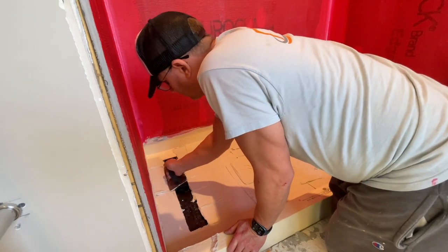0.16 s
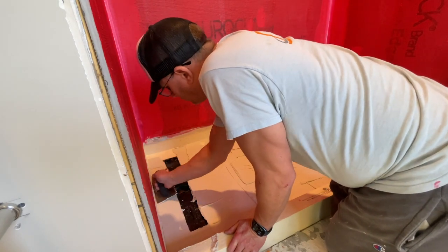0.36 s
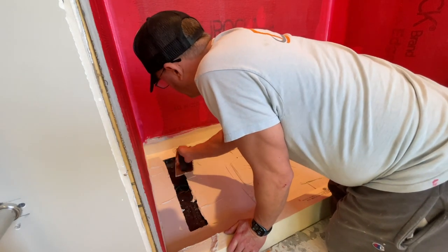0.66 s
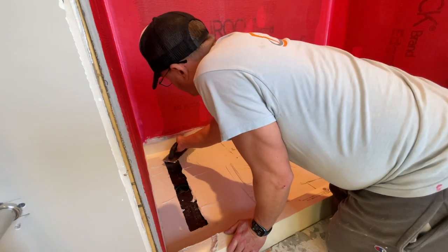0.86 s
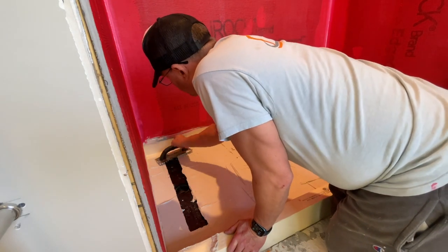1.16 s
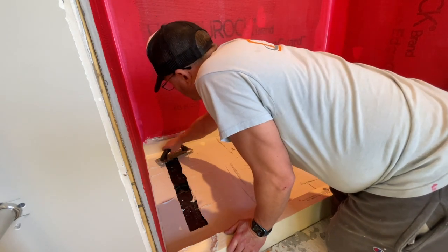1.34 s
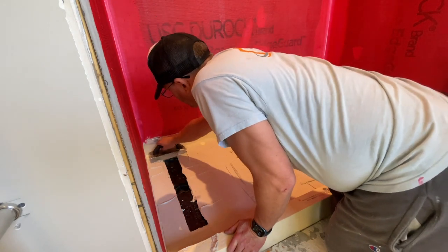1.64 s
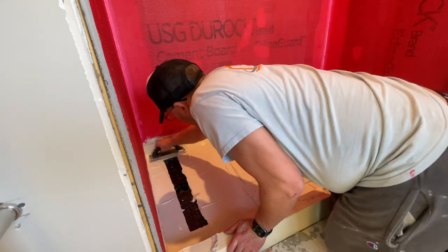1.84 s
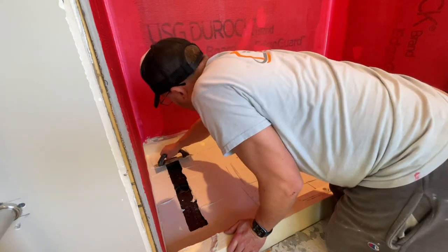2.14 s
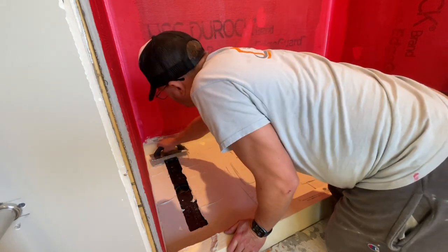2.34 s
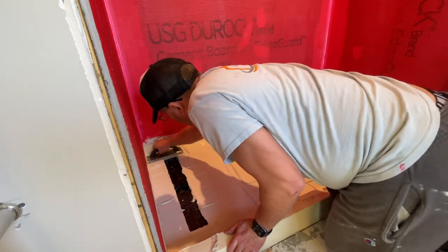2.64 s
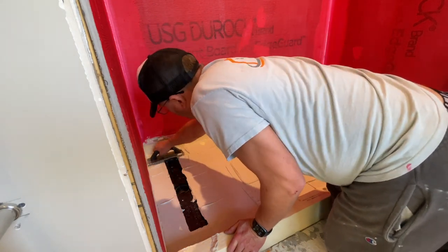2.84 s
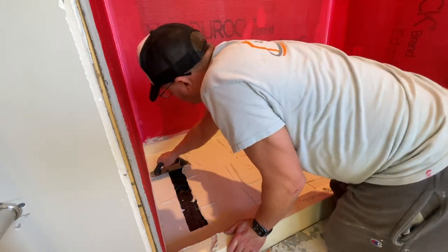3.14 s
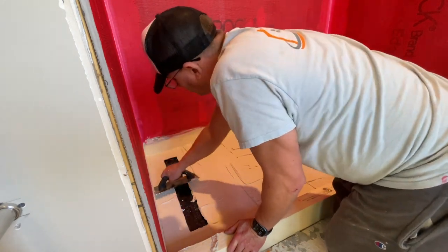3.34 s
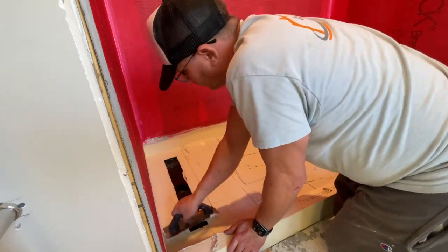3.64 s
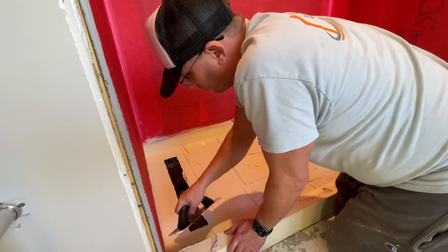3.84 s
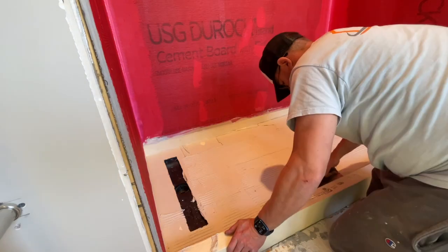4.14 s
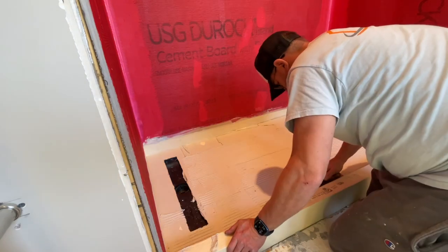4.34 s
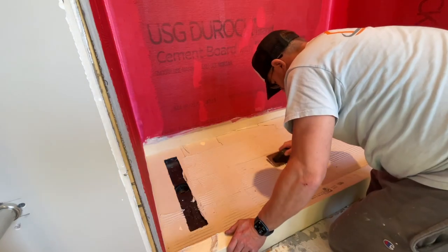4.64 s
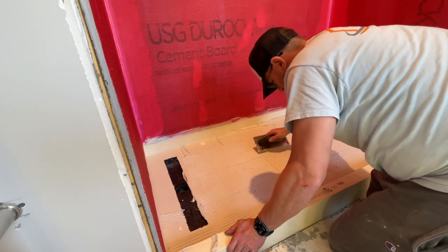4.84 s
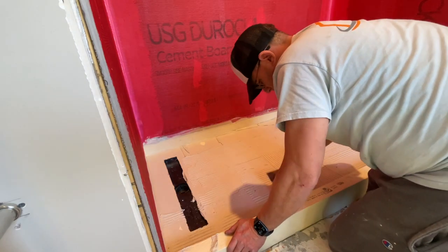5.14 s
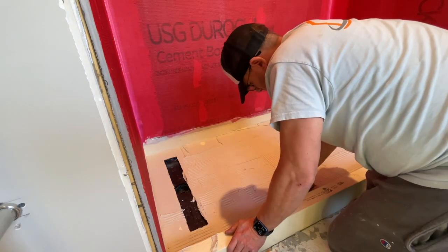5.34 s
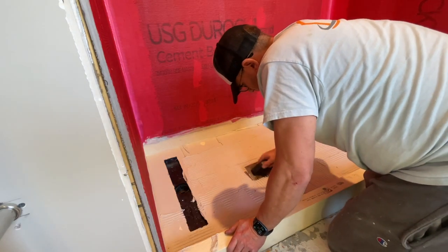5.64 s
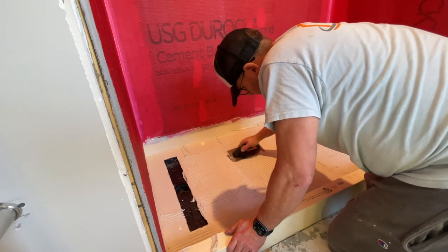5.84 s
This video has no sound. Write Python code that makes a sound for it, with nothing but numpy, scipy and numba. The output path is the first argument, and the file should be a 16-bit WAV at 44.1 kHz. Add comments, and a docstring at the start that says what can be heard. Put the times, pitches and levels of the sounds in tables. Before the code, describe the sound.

A small bare bathroom with a low, faint rumble and bright, diffuse echoes, heard close in stereo. A short gritty dab opens at 0 s. At 0.35 s the trowel lands with a sharp, hollow double knock and wet slap, a lesser knock at 0.4, then a rasp to 0.55. Light dabs with tiny ticks and soft thuds follow around 1.05, 1.3-1.4 and 1.6-1.8 s. A faint sweep runs 1.9-2.2 s, ending in a dull bump; very quiet touches and bumps follow to 2.7. From 2.7 to 3.8 s a long, light drag sounds hollower midway and flares briefly at 3.7. After a pause and a small dab at 4.2, a loud, sandy scrape swells from 4.37, peaks near 4.6-4.8 and stops by 4.94, with steely ring and sliding hollow tone. Small knocks at 5.3 precede another strong scrape, 5.4-6 s, loudest near 5.6.

```python
"""Small, bare bathroom: a steel trowel spreads mortar over a foam shower tray, in short dabs and long sweeps.
Scrape and hiss: random sand-grain impulses, filtered; they ring the blade's modes and boom in the hollow tray.
Sweeps add the gliding note of the air wedge under the blade. Knocks are decaying tray modes with a wet slap;
edge ticks and dull bumps are short noise bursts. Background noise, mostly low, lies under it all.
A phone close by hears mostly the room: diffuse echoes and the shower stall's standing waves."""
import sys
import numpy as np
from scipy import signal
from scipy.fft import rfft, irfft
from scipy.io import wavfile
from scipy.ndimage import map_coordinates
from numba import njit

SR = 44100
rng = np.random.default_rng(int(sys.argv[2]) if len(sys.argv) > 2 else 0)


def wav_record(signal):
    """Record a signal, one row per channel, as 16-bit PCM in the file named by sys.argv[1]."""
    frames = np.transpose(np.atleast_2d(signal))
    bounded = np.clip(frames, -1, 1)
    # unit amplitude maps onto the largest positive 16-bit level
    quanta = np.round(bounded * 32767).astype(np.int16)
    wavfile.write(sys.argv[1], SR, quanta)


N = 264159
T = np.arange(N) / SR
TAIL_SAMPLES = int(.7 * SR)

# spectrum of the scrape: f/Hz, relative level/dB
SCRAPE_SPECTRUM = [(300, -40), (600, -2), (850, 1.5), (1300, 7), (1900, 4.5), (2700, 1.5), (3800, -0.5),
                   (4700, -6), (6000, -35.5)]
# spectrum of the sand's hiss: f/Hz, relative level/dB
HISS_SPECTRUM = [(2500, -23.5), (4000, -7.5), (5100, -4), (5650, -11), (6100, -4.5), (6950, -5),
                 (7400, -13), (8100, -7), (8900, -8), (9600, -15), (11000, -7), (12700, -6.5), (14500, -14),
                 (16000, -27)]
# long sweeps, one pressure curve each: t/s, pressure as scrape level/dB
SWEEP_PRESSURES = [
    [(1.89, -45.5), (1.97, -39), (2.096, -40.5), (2.164, -35.5), (2.2, -60)],
    [(2.712, -50.5), (2.808, -43), (2.954, -44), (3.09, -42), (3.102, -37.5), (3.558, -38), (3.696, -27),
     (3.77, -44), (3.79, -40)],
    [(4.365, -43), (4.385, -37.5), (4.465, -28.5), (4.555, -28.5), (4.619, -23), (4.673, -25), (4.779, -24),
     (4.94, -66)],
    [(5.395, -45), (5.487, -27), (5.613, -22.5), (5.767, -26), (5.803, -28), (5.929, -27), (5.99, -72)],
]
SWEEP_DB = 0.5  # added to every pressure
EASY_DB = -39  # easy pressure, where layer offsets apply


def undb(db):
    """Decibels to gain."""
    return 10 ** (np.asarray(db) / 20)


def unit(x):
    """Scale to rms 1."""
    return x / np.sqrt(np.mean(x ** 2))


def along(rows):
    """Each column of a time curve, sample by sample."""
    s, *columns = np.transpose(rows)
    return [np.interp(T, s, c) for c in columns]


def at_hz(points, hz):
    """Read a table on a log-frequency axis."""
    f, value = np.transpose(points)
    return np.interp(np.log(hz + 1), np.log(f), value)


def colour(x, points, size=2048):
    """Minimum-phase filter with the given spectrum, by folding the cepstrum."""
    log_gain = np.log(undb(at_hz(points, np.fft.rfftfreq(size, 1 / SR))))
    cepstrum = irfft(log_gain)
    cepstrum[1:size // 2] *= 2
    cepstrum[size // 2 + 1:] = 0
    response = irfft(np.exp(rfft(cepstrum)))
    return signal.fftconvolve(x, response)[:N]


@njit
def resonate(x, hz, width):
    """State-variable band-pass; centre hz may move every sample, width in Hz."""
    y, band, low = np.empty(len(x)), 0., 0.
    for i in range(len(x)):
        g, k = np.tan(np.pi * hz[i] / SR), width / hz[i]
        v = (band + g * (x[i] - low)) / (1 + g * (g + k))
        band, low, y[i] = 2 * v - band, low + 2 * g * v, k * v
    return y


def walk(rate_hz):
    """Random wander, rms 1, linear between rate_hz knots per second."""
    return unit(np.interp(T * rate_hz, np.arange(4096), rng.standard_normal(4096)))


def add(track, s, sound):
    """Lay a sound into the track at time s."""
    i = max(int(s * SR), 0)
    track[i:i + len(sound)] += sound[:N - i]


def background(level_db=-54.5, side_db=-9, waver_db=1.4):
    """Background noise: low rumble with faint hiss on top, wavering a little."""
    # background spectrum: f/Hz, relative level/dB
    background_spectrum = [(20, -28), (50, -5), (70, 2), (120, -2.5), (190, 2), (300, -3.5), (450, -8),
                           (700, -13.5), (1500, -26), (3000, -33), (8000, -44), (16000, -36.5)]
    mid, side = (unit(colour(rng.standard_normal(N), background_spectrum)) * undb(waver_db * walk(14))
                 for _ in range(2))
    return undb(level_db) * (mid + undb(side_db) * side * np.array([[1], [-1]]))


def grains(rate_hz, spread_db):
    """Sand grains snapping free: random impulses, many small, a few large."""
    size = undb(spread_db * np.minimum(rng.exponential(size=N), 6))
    snaps = rng.random(N) < rate_hz / SR
    return unit(snaps * size * rng.choice([-1, 1], N))


def contact(sweep, edge_s=0.0081):
    """1 from a sweep's first to last point, with short ramps outside."""
    return np.clip(np.minimum(T - sweep[0][0], sweep[-1][0] - T) / edge_s + 1, 0, 1)


def driven(sweep, offset_db, growth):
    """Gain of a layer in a sweep: offset_db at easy pressure, growth in dB per dB of pressure."""
    harder_db = along(sweep)[0] + SWEEP_DB - EASY_DB
    return contact(sweep) * undb(EASY_DB + offset_db + growth * harder_db)


def hand(sand_db=-2, sand_growth=0.77, hollow_db=-8, hollow_growth=0.4, release_s=0.047):
    """Gains of scrape, hiss and boom: sweeps follow pressure; dabs rise, hold and ease off."""
    # dabs working the mortar in: t/s, length/s, attack/s, level/dB, hiss re level/dB, boom re level/dB
    dabs = [ (0.0, .13, 0.01, -43, 1.5, 0), (0.404, 0.086, .015, -47, 4.5, 9.5),
            (0.462, .1, 0.036, -39, -5, -8.5), (0.652, 0.19, 0.013, -57, -3, -2.5),
            (1.02, .04, 0.006, -47.5, 1, -2), (1.053, 0.066, 0.0027, -50, -12, 9),
            (1.296, 0.072, 0.016, -61, -5, 2.5), (1.374, 0.043, 0.0026, -39.5, -15.5, -3),
            (1.613, .13, 0.02, -46.5, -13.5, 3.5), (1.7, 0.13, .01, -49, -1, 3.5),
            (2.325, 0.097, 0.013, -61, 3, 0), (2.496, 0.061, .003, -54.5, -3, -1.5),
            (2.538, 0.18, .02, -57, -4, 2), (4.225, 0.12, 0.0079, -49, -4, -13.5),
            (5.324, 0.05, 0.0054, -39, -10, 3), ]
    force = np.zeros((3, N))
    # the tray sounds hollower while the blade passes the drain
    drain_s, drain_spread_s, drain_db = 3.42, 0.33, 3.5
    boom_db = hollow_db + drain_db * np.exp(-((T - drain_s) / drain_spread_s) ** 2)
    for sweep in SWEEP_PRESSURES:
        force += [driven(sweep, 0, 0.99),
                  driven(sweep, sand_db, sand_growth),
                  driven(sweep, boom_db, hollow_growth)]
    for s, length_s, attack_s, level, hiss, boom in dabs:
        shape = np.clip(np.minimum((T - s) / attack_s, (s + length_s - T) / release_s), 0, 1)
        force += np.outer(undb([level, level + hiss, level + boom]), shape)
    return force


def scraping(judder_db=2, blade_db=-10, blade_bite=1.0, scrape_db=-1, hiss_db=0, boom_db=-1):
    """Grit drags under the blade in uneven slips, driving the steel and the tray beneath."""
    # narrow rings of the steel blade: f/Hz, width/Hz, relative level/dB
    blade_modes = [(1250, 7, -5), (1270, 19, -11), (1610, 23, -1), (1677, 6.9, 24.5), (1870, 28, 20),
                   (2210, 9.6, 24), (2320, 6, 9), (2690, 210, 14), (3350, 14, -6), (3731, 18, 3)]
    # spectrum of the hollow tray: f/Hz, relative level/dB
    boom_spectrum = [(50, -17), (130, -8), (250, 1), (400, 7), (580, 5.5), (800, 1.5), (1300, -31.5)]
    scrape_force, hiss_force, boom_force = hand()
    slips = undb(judder_db * walk(60))
    coarse = slips * grains(rate_hz=4600, spread_db=2.0)
    fine = slips * grains(rate_hz=6000, spread_db=1.5)
    steel = unit(sum(undb(db) * resonate(coarse, np.full(N, float(hz)), float(width))
                     for hz, width, db in blade_modes))
    # wet mortar damps the steel unless the stroke is hard
    bite = (scrape_force / scrape_force.max()) ** blade_bite
    scrape = unit(colour(coarse, SCRAPE_SPECTRUM)) + undb(blade_db) * bite * steel
    hiss = unit(colour(fine, HISS_SPECTRUM))
    boom = unit(colour(coarse, boom_spectrum))
    return (undb(scrape_db) * scrape_force * scrape
            + undb(hiss_db) * hiss_force * hiss
            + undb(boom_db) * boom_force * boom)


def ticks(gain_db=-3, ring_db=-4):
    """The steel edge crushes a few grains: short decaying noise, coloured as hiss and scrape."""
    # ticks on grit: t/s, relative level/dB, crunch decay/ms
    crunches = [(0.344, -21, 0.86), (0.3621, -17, 4.1), (0.418, -21, 1.7), (1.031, -18.5, 0.71),
                (1.054, -23, 1.9), (1.380, -26, 2), (1.715, -16.5, 0.57), (1.8817, -21, 1.4),
                (2.703, -27.5, 2.7), (4.2041, -33, 6.4), (4.225, -20.5, 2.4), (4.257, -22.5, 3.2),
                (5.3007, -28.5, 2), (5.327, -23.5, 2.4)]
    out, t = np.zeros(N), T[:SR // 10]
    for s, db, crunch_ms in crunches:
        crunch = rng.standard_normal(len(t)) * np.exp(-t * 1000 / crunch_ms)
        add(out, s, undb(db + gain_db) * crunch)
    return colour(out, HISS_SPECTRUM) + undb(ring_db) * colour(out, SCRAPE_SPECTRUM)


def knocks(gain_db=0, slap=1.0, slap_s=0.0064, slap_low_hz=300, slap_high_hz=1900, radiate_hz=190):
    """The flat blade pushes the tray's modes and slaps wet mortar; softer contact loses the highs."""
    # trowel lands flat: t/s, relative peak/dB, contact softness/ms, pitch ratio of that spot
    landings = [(.3445, -15.5, 0.14, 1), (.3490, -15, 0.21, 0.99), (.396, -22, 0.18, 1.1),
                (1.0533, -28, 0.3, 0.83), (1.6195, -28.5, 0.092, 0.94), (1.6234, -24, 0.11, 0.75),
                (1.697, -29.5, 0.16, 1), (2.506, -44, .14, 1.2), (2.544, -35.5, 0.37, 0.83),
                (5.305, -31, 0.25, 0.55), (5.335, -24, 0.39, 1.18)]
    # modes of the tray with the blade on it: f/Hz, relative level/dB, t60/s
    tray_modes = [(214, -27.5, .1), (300, -43, 0.078), (395, -10, 0.14), (485, 5.5, 0.072),
                  (575, -5.5, 0.12), (714, -4, 0.062), (847, -10, 0.11), (970, -17.5, 0.11),
                  (1042, -2, 0.13), (1180, -1.5, 0.055), (1295, -11, 0.16), (1480, -17, 0.054),
                  (1690, -12, .04)]
    out, t = np.zeros(N), T[:SR // 4]
    band = signal.butter(3, [slap_low_hz, slap_high_hz], "band", fs=SR, output="sos")
    # a small patch of tray moves little air in the bass
    radiate = signal.butter(2, radiate_hz, "high", fs=SR, output="sos")
    for s, db, soft_ms, pitch in landings:
        ring = sum(undb(mode_db - 60 * t / t60) * np.sin(2 * np.pi * hz * pitch * t)
                   for hz, mode_db, t60 in tray_modes)
        push = t * np.exp(-t * 1000 / soft_ms)
        noise = unit(signal.sosfilt(band, rng.standard_normal(len(t))))
        squelch = slap * noise * np.exp(-t / slap_s)
        pushed = signal.fftconvolve(ring + squelch, push)[:len(t)]
        blow = signal.sosfilt(radiate, pushed)
        add(out, s, undb(db + gain_db) * blow / np.abs(blow).max())
    return out


def bumps(gain_db=-2, fade_s=0.022, low_hz=65, high_hz=260):
    """Weight shifting on the tray: soft, low thuds of band-passed decaying noise."""
    # dull bumps: t/s, relative peak/dB
    shifts = [(0.788, -44.5), (1.058, -35), (1.621, -34), (2.219, -34), (2.518, -35.5), (2.585, -36),
              (2.662, -41), (5.31, -51), (5.352, -43.5)]
    out, t = np.zeros(N), T[:SR // 4]
    band = signal.butter(2, [low_hz, high_hz], "band", fs=SR, output="sos")
    for s, db in shifts:
        thud = signal.sosfilt(band, rng.standard_normal(len(t)) * np.exp(-t / fade_s))
        add(out, s, undb(db + gain_db) * thud / np.abs(thud).max())
    return out


def wedge(width_hz=290.0, level_db=-12.5, growth=0.88):
    """Hollow note of the air wedge in sweeps: pitch follows blade tilt, level follows pressure and clearness."""
    # blade tilt: t/s, f/Hz, clearness/dB
    tilt = [(3.4, 990, 2), (3.72, 1490, 4), (4.4, 1110, 5.5), (4.62, 1280, -8), (4.78, 920, 6),
            (4.85, 940, 6), (4.92, 1180, 19), (5.45, 1160, -1), (5.65, 1250, -3), (5.9, 1100, -1)]
    hz, clear_db = along(tilt)
    grit = grains(rate_hz=5300, spread_db=3.5)
    ring = resonate(resonate(grit, hz, width_hz), hz, width_hz)
    return unit(ring) * sum(driven(sweep, level_db + clear_db, growth) for sweep in SWEEP_PRESSURES)


def direct(x):
    """The straight path reaches the left microphone first; the level balance follows the trowel."""
    # where the trowel works: t/s, left lead/ms, left minus right/dB
    place = [(0, 0.19, -2.5), (3.7, 0.17, 3.5), (4.3, 0.023, -8), (4.7, 0.02, 5), (5.3, 0.054, -4.5),
             (5.99, 0.042, -4)]
    lead_ms, pan_db = along(place)
    late = map_coordinates(x, [np.arange(N) - lead_ms * SR / 1000], order=3)
    return np.array([x, late]) * undb(np.array([pan_db, -pan_db]) / 2)


def room_tail(apart_hz=300, build_s=0.002, early=0.46, early_s=0.019, size=512):
    """Diffuse echoes of the hard walls: noise fading per band; the microphones agree only in the bass."""
    # room decay: f/Hz, t60/s
    room_t60 = [(100, 0.73), (400, 0.42), (1000, 0.61), (3000, 0.48), (7000, 0.49), (14000, 0.25)]
    hz, t, (mid, side) = signal.stft(rng.standard_normal((2, TAIL_SAMPLES)), SR, nperseg=size)
    alike = np.exp(-(hz / apart_hz) ** 2)[:, None] * .9
    fade = undb(-60 * t / at_hz(room_t60, hz)[:, None])
    pair = np.sqrt(1 + alike) * mid + np.sqrt(1 - alike) * side * np.array([1, -1])[:, None, None]
    tail = signal.istft(pair * fade, SR)[1][:, :TAIL_SAMPLES]
    t = T[:TAIL_SAMPLES]
    tail = tail * (1 - np.exp(-(t / build_s) ** 2)) * (1 + early * np.exp(-t / early_s))
    return tail / np.sqrt(np.sum(tail ** 2) / 2)


def standing_waves(gain_db=-45, t60_s=0.56, apart_hz=900):
    """The stall's own notes; the shorter the wave, the more its phase differs between microphones."""
    # standing waves of the shower stall: f/Hz, relative level/dB
    stall_modes = [(146, -11), (196, -18.5), (396, -12), (473, -15), (511, -14.5), (566, -21), (710, -10.5),
                   (758, -6), (905, -19), (960, 1.5), (1038, -10.5), (1160, 0), (1246, -7.5)]
    t, sides = T[:TAIL_SAMPLES], np.array([[1], [-1]])
    waves = sum(undb(db) * np.sin(2 * np.pi * hz * t + sides * hz / apart_hz) for hz, db in stall_modes)
    return undb(gain_db - 60 * t / t60_s) * waves


def heard(x, response):
    """A mono sound through a stereo response."""
    return signal.oaconvolve(x[None].astype("f"), response.astype("f"), axes=1)[:, :N]


def moving_room(x, count=6, travel_hz=55):
    """Echo pattern shifts among random tails as grit catches at different places along the moving blade."""
    share = np.array([walk(travel_hz) for _ in range(count)])
    share /= np.sqrt(np.sum(share ** 2, axis=0))
    return sum(heard(x * part, room_tail()) for part in share)


def scene(grit_direct_db=-5, grit_room_db=0, tray_direct_db=-1, tray_room_db=-3):
    """Trowel and tray, heard straight and through the room, over the background noise."""
    grit = scraping() + wedge() + ticks()
    tray = knocks() + bumps()
    grit_room = undb(grit_room_db) * moving_room(grit)
    tray_room = heard(tray, undb(tray_room_db) * room_tail() + standing_waves())
    straight = direct(undb(grit_direct_db) * grit + undb(tray_direct_db) * tray)
    return straight + grit_room + tray_room + background()


def record(dry, mono_hz=9800, top_hz=15600):
    """One side is duller; the top treble is mono and the very top is cut."""
    # level balance over frequency: f/Hz, left minus right/dB
    side_balance = [(200, 0), (500, 1.6), (1200, 1.5), (2400, 2), (4400, 3.5), (8100, 7.5), (11000, -3)]
    balance_db = at_hz(side_balance, np.fft.rfftfreq(N, 1 / SR))
    left, right = irfft(rfft(dry) * undb(np.array([balance_db, -balance_db]) / 2), N)
    mid, side = (left + right) / 2, (left - right) / 2
    side = signal.sosfiltfilt(signal.butter(10, mono_hz, fs=SR, output="sos"), side)
    top_cut = signal.ellip(10, .2, 80, top_hz, fs=SR, output="sos")
    return signal.sosfilt(top_cut, np.array([mid + side, mid - side]))


dry = scene()
out = record(dry)
wav_record(out)
```